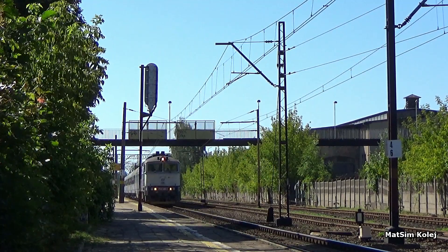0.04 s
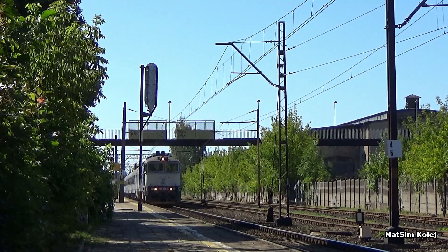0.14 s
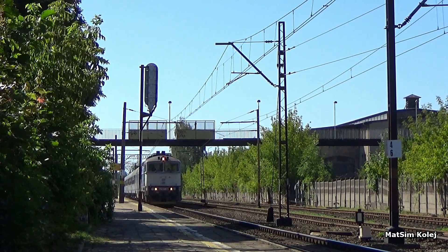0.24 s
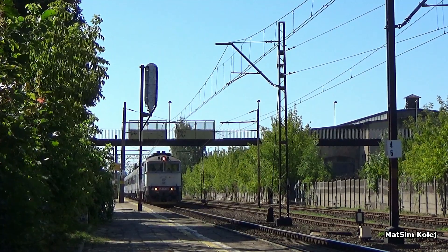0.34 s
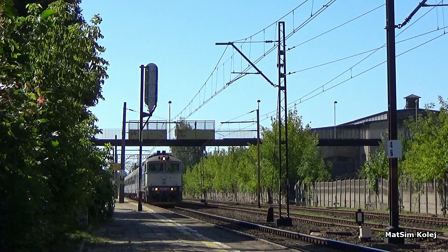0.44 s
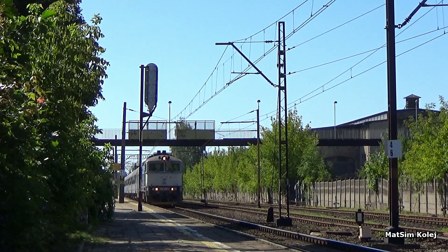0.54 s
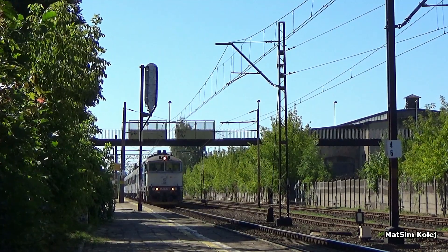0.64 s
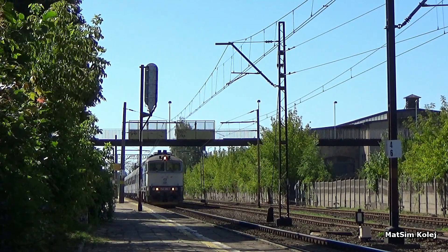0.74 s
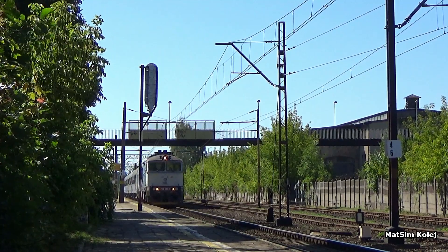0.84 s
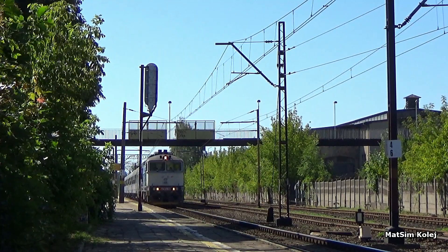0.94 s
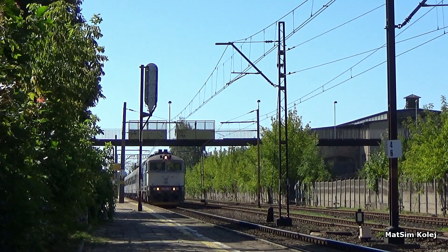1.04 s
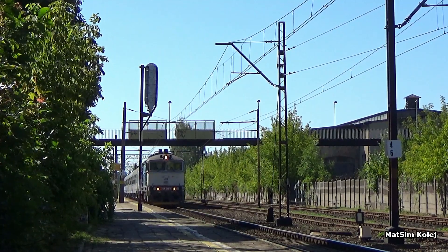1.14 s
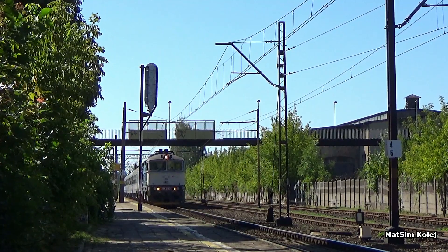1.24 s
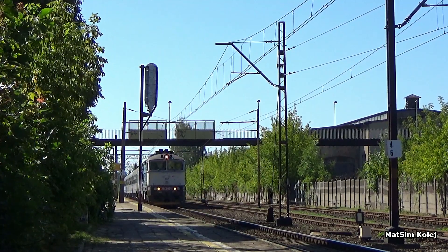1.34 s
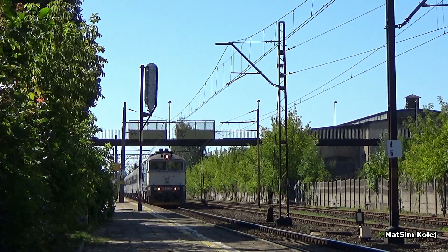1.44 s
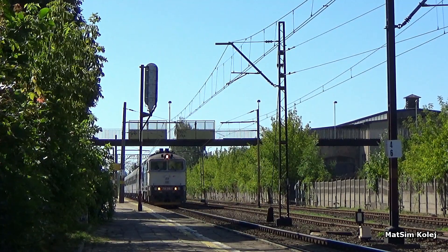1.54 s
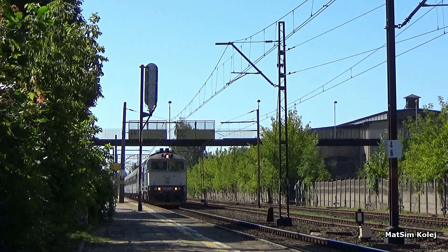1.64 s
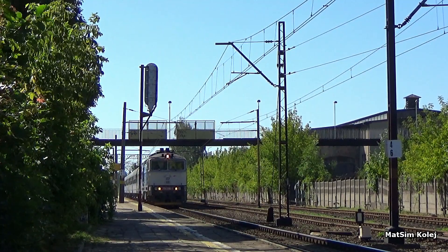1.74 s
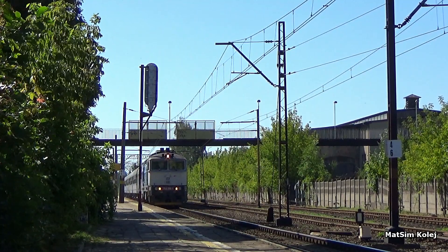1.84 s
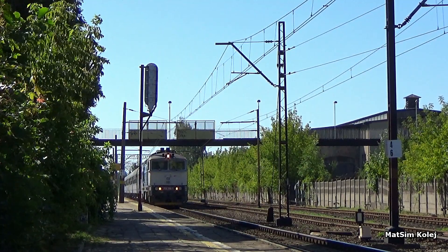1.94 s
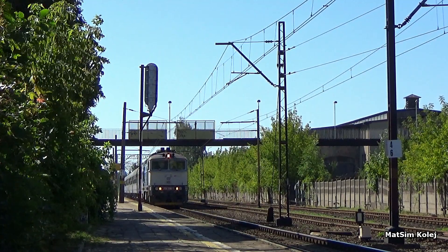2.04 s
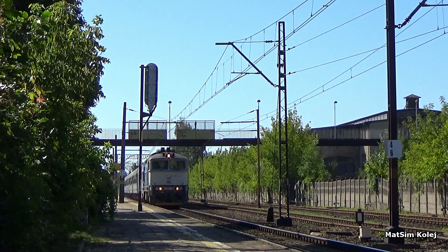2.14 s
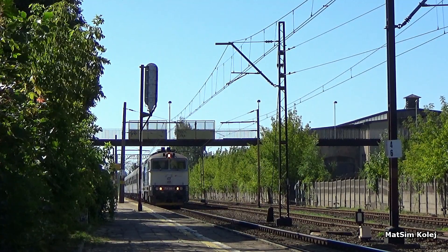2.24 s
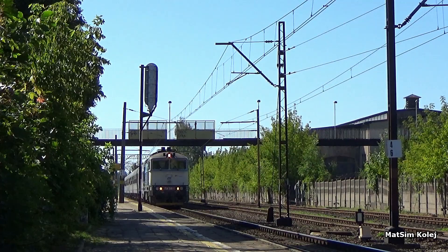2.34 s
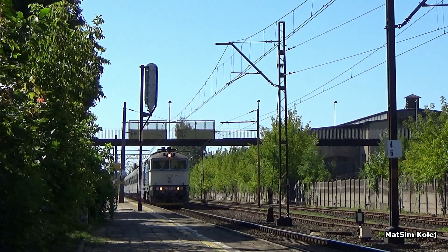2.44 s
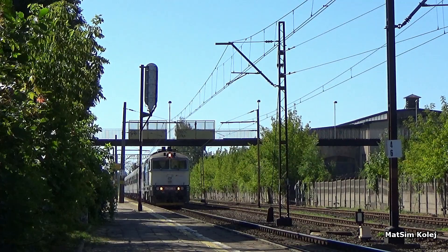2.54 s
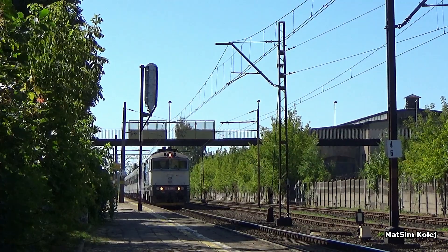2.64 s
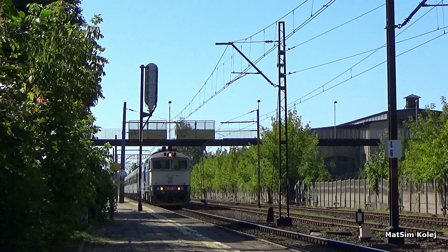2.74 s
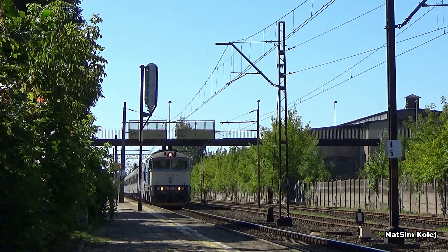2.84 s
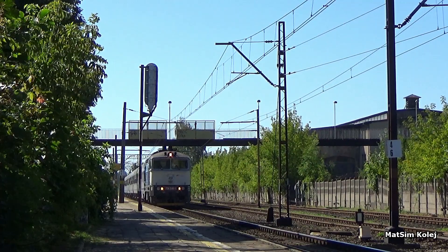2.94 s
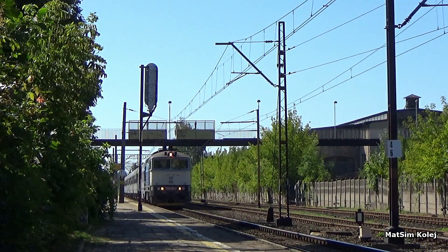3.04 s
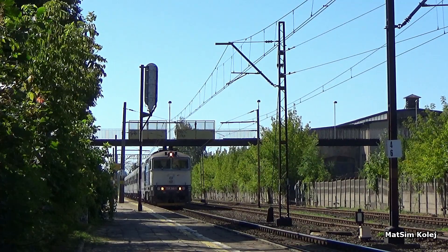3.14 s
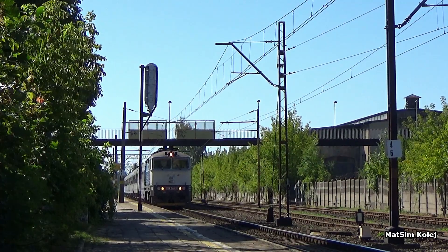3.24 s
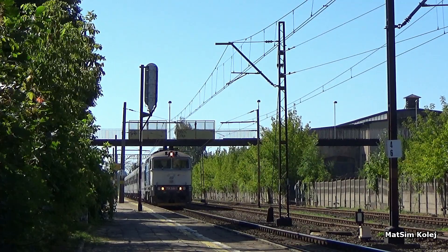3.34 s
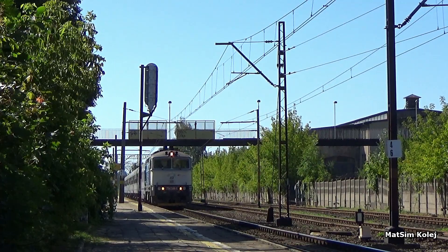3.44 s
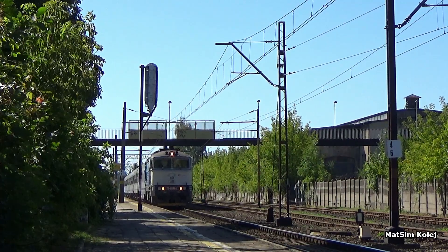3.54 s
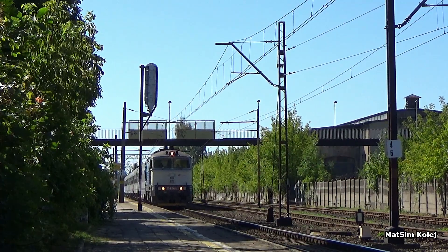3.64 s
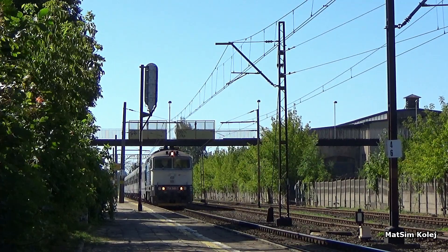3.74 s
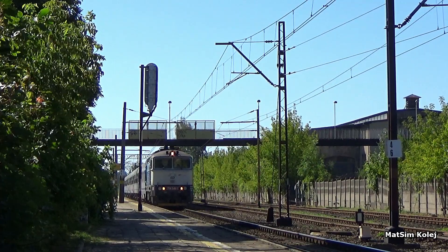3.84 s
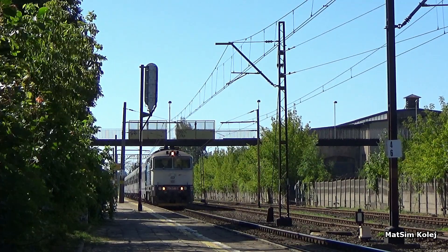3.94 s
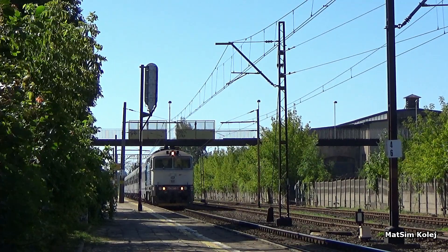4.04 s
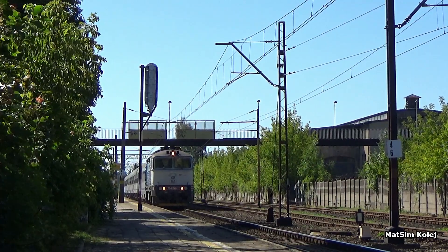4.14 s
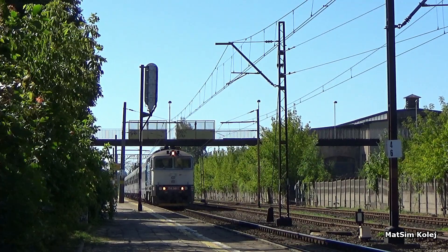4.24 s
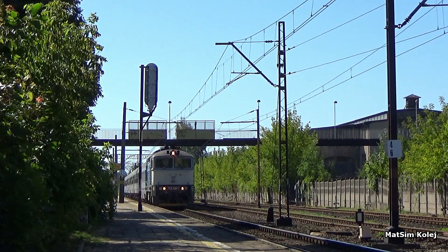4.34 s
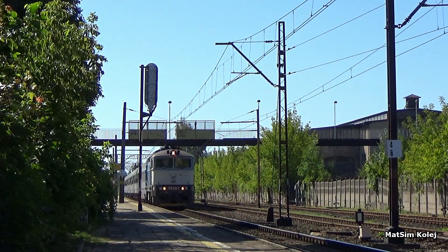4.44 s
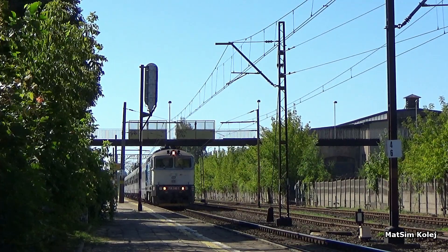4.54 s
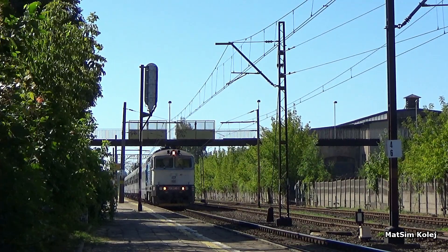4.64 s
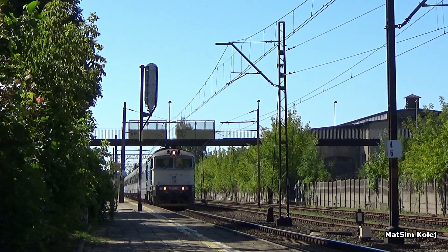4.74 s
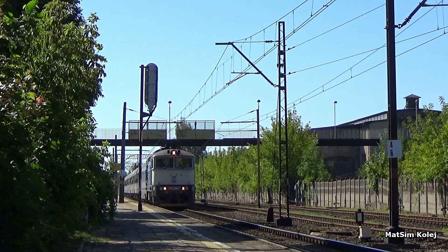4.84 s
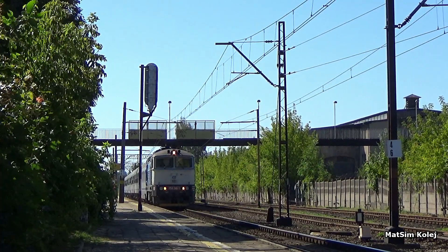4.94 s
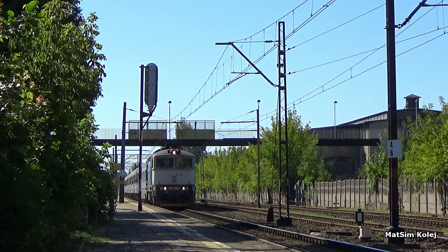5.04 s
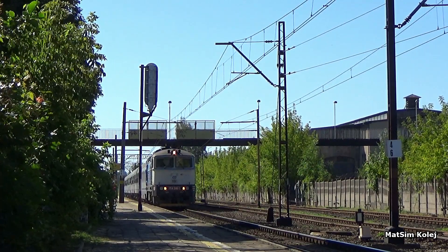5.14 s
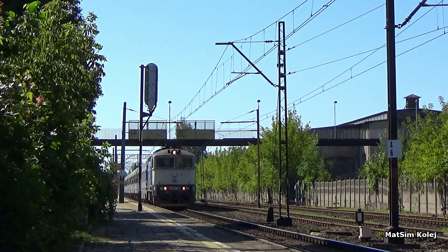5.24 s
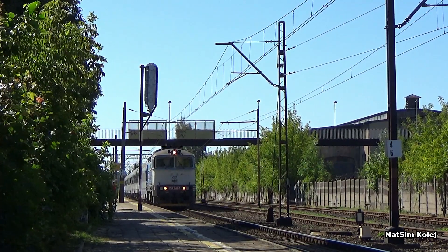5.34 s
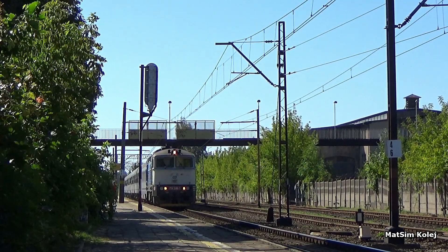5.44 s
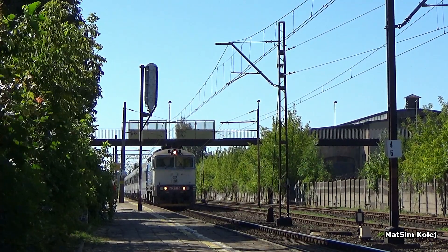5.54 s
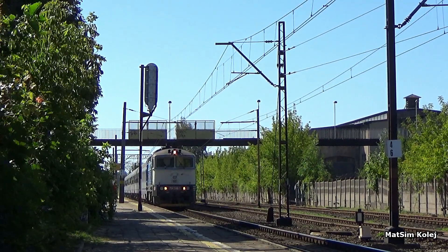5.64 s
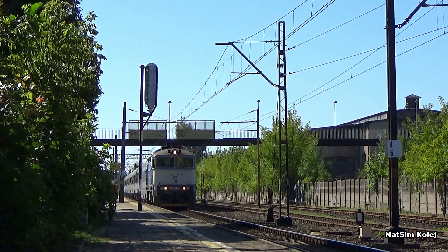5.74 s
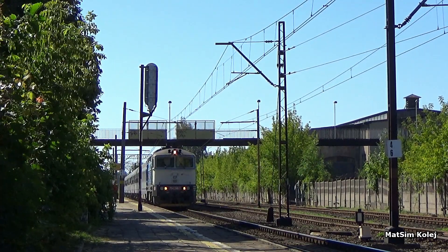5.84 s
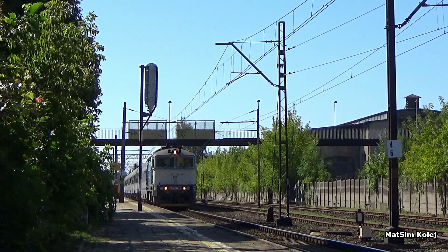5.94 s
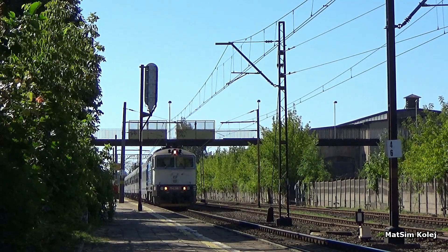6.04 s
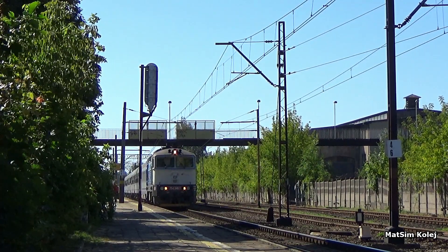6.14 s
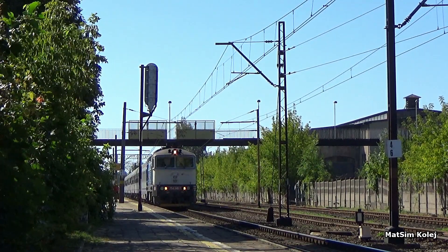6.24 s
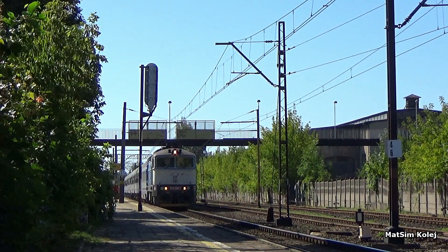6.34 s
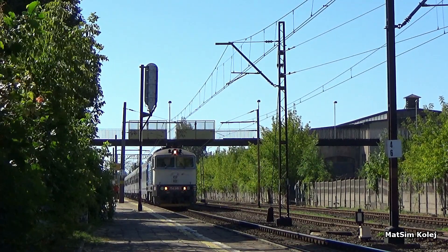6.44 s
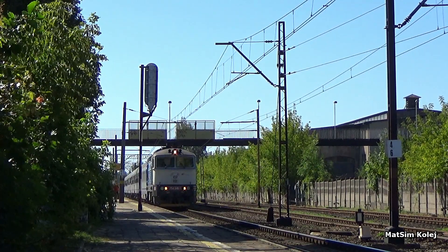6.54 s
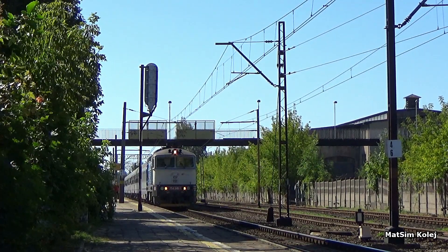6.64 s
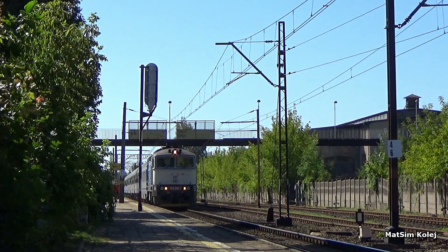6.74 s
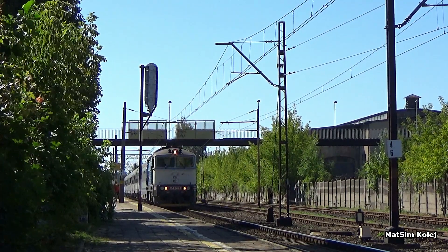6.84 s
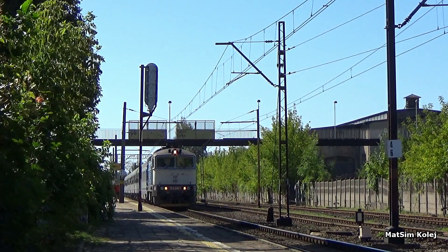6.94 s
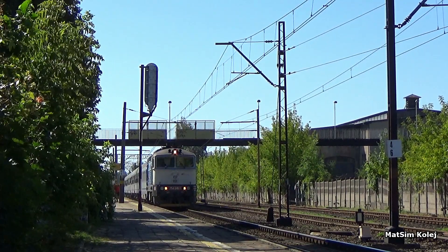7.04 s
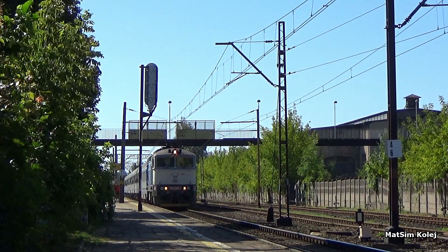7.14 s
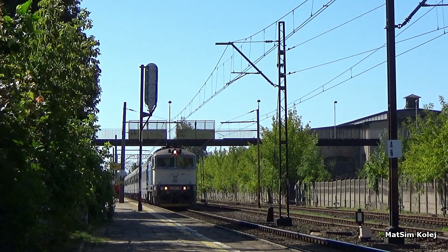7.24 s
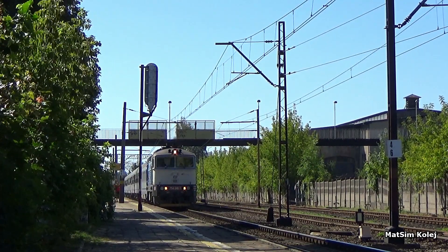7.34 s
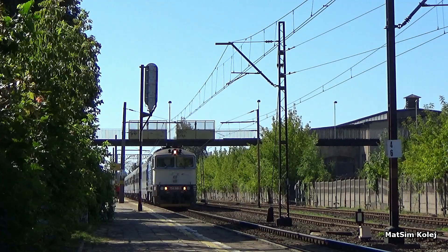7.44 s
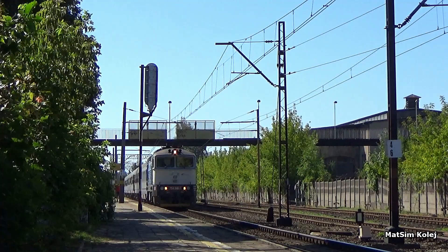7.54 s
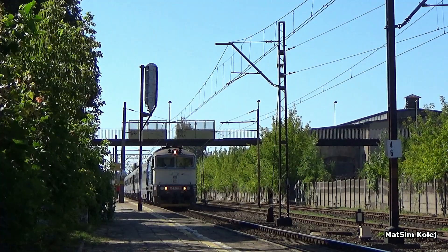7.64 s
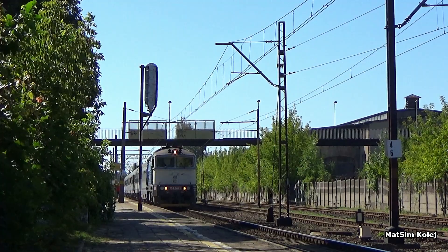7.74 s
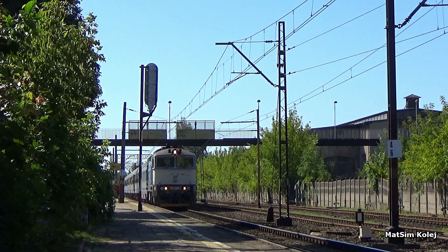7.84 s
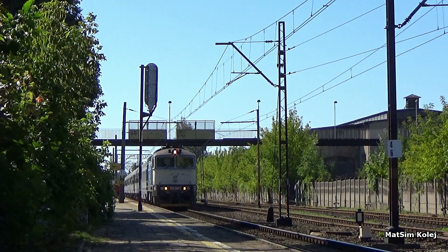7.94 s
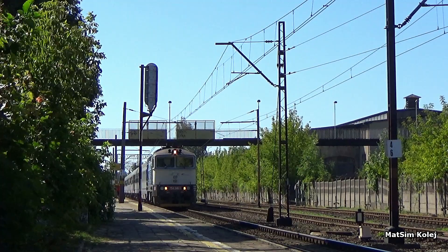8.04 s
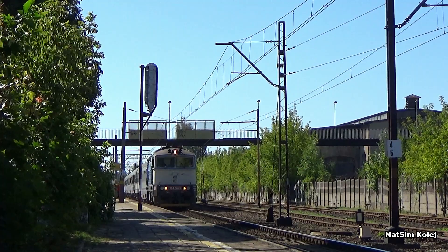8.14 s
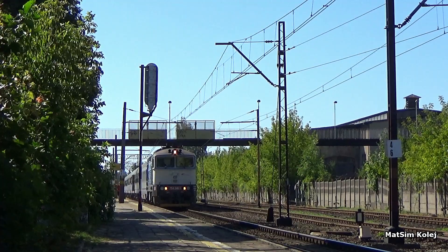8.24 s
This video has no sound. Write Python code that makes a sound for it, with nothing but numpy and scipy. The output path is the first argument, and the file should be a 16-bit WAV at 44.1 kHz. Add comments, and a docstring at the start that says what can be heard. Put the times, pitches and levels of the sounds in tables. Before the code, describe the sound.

A diesel passenger train brakes slowly along an outdoor platform. A high, wavering wheel squeal rides over the low roar of engine and rails, with grinding, hissing brakes. The squeal grows louder, joined by short squeaks and a thin whistle, then dies away near the end as a faint whine rises. A fan hums softly, couplings knock twice in the distance, and wind puffs on the microphone.

```python
"""A high, wavering squeal over a low roar: a diesel-hauled train brakes to a halt down a platform.
Stick-slip friction drives four wheels near one pitch, so they beat, with weaker rings below and above.
The brakes also grind, hiss, squeak and whistle thinly; a fan hums, couplings knock far off,
and a whine rises as the train stops. Wind puffs on the microphone ports."""
import sys
import numpy as np
from scipy.fft import rfft, irfft, next_fast_len
from scipy.io import wavfile
from scipy.ndimage import uniform_filter1d, map_coordinates

SR = 44100
rng = np.random.default_rng(int(sys.argv[2]) if len(sys.argv) > 2 else 0)


def persist_wave(psi):
    """Save psi, clipped to +-1, as 16-bit WAV."""
    counts = np.round(np.clip(psi, -1, 1) * 32767).astype(np.int16)
    wavfile.write(sys.argv[1], SR, np.atleast_2d(counts).T)


N = 366030

# Noise spectra. Each row: frequency in Hz, relative spectral density in dB.
MIC_HISS_SPECTRUM = [(5000, -31), (8000, -2.5), (12000, -9), (15700, -17)]
BUFFET_SPECTRUM = [(12, -66), (20, -33), (101, -4), (167, 2), (232, -5), (297, -4), (450, -19.5),
                   (580, -60.5), (990, -120)]
ROAR_SPECTRUM = [(24, -53), (40, -21.5), (108, -14), (166, -11.5), (407, -10.5), (500, -8.5), (603, -7.5),
                 (769, -5), (1140, -4), (1200, -5.5), (1540, -6), (2190, -10.5), (3300, -13), (4550, -77),
                 (7700, -120)]
GRIND_SPECTRUM = [(1500, -30), (2000, -7.5), (3000, -0.5), (4300, 0), (5000, -11.5), (6000, -51)]
BRAKE_HISS_SPECTRUM = [(4000, -24), (5200, 4.5), (6500, -4), (8500, -10.5), (10500, -15), (13000, -45),
                       (15700, -32)]
# Likeness of the broad noises at the two ears. Each row: frequency in Hz, correlation.
COHERENCE = [(60, 1), (300, 0.98), (1000, 0.81), (3000, 0.92), (6000, 0.87), (10000, 1), (12000, 1)]
# Stereo balance of all but the wind. Each row: frequency in Hz, left minus right in dB.
BALANCE = [(60, -3), (99, 0.0), (160, 0), (270, -1), (450, 0), (740, -1.0), (1220, -1), (2010, -3),
           (3330, -2.5), (5500, -0.5), (9080, 1), (15000, 0.0)]
# Sustained gusts. Each row: start in seconds, length in seconds, strength in dB.
WIND_GUSTS = [(0, 1.2, -63), (2.749, 1.44, -45), (4.263, 0.29, -50), (4.554, 0.9, -50.5)]
# Sudden puffs. Each row: centre in seconds, half-width in seconds, strength in dB.
WIND_PUFFS = [(0.335, 0.012, -38), (.564, 0.017, -34), (.6, 0.0071, -32.5), (2.824, 0.015, -40),
              (2.903, 0.015, -38), (2.958, 0.0077, -34), (3.03, 0.021, -33), (3.078, 0.0075, -34),
              (3.175, 0.027, -32), (3.382, 0.019, -47), (3.527, 0.025, -31.5), (3.562, 0.013, -26.5),
              (3.6, 0.014, -37), (4.021, 0.0088, -39.5), (4.111, 0.01, -36), (4.29, 0.022, -40),
              (4.385, 0.032, -34.5), (4.465, 0.025, -37), (4.721, 0.016, -30.5), (4.88, .015, -42),
              (4.916, 0.015, -26), (5.233, 0.023, -46.5), (6.296, 0.021, -38.5)]
# Roar of engine and rails. Each row: time in seconds, level in dB.
ROAR_LEVEL = [(0.0, -36.5), (2.5, -39.5), (5.15, -40), (7.14, -38.5), (8.3, -42)]
# Fan harmonics. Each row: multiple, base and peak level in dB, peak time and half-width in seconds.
FAN_HARMONICS = [(4, -61, -56, 7.8, 1.6), (5, -64, -57, 5, 1.8), (7, -62, -51, 6.6, .8),
                 (8, -66, -52, 6.9, .9), (9, -62, -49.5, 6, 3)]
# Late whine. Each row: time in seconds, pitch in Hz.
WHINE_PITCH = [(6.85, 1350), (7.7, 1572), (8.2, 1572)]
# Coupling impacts. Each row: start in seconds, level in dB, 60 dB decay time in seconds, centre in Hz.
COUPLING_KNOCKS = [(5.385, -30, .35, 2800), (7.48, -28, .13, 1400)]
# Grinding of the brake blocks. Each row: time in seconds, level in dB.
GRIND_LEVEL = [(0.0, -44), (1.4, -42.5), (1.65, -38.5), (2.56, -42), (3.3, -40.5), (3.88, -37), (4.35, -42),
               (6.36, -40), (6.75, -37.5), (7.05, -44.5), (7.25, -48.5), (8.0, -55), (8.3, -51.5)]
# High modes of the brake discs. Each row: time in seconds, level in dB.
DISC_LEVEL = [(0.0, -58), (1.02, -60), (1.15, -53), (1.7, -51), (1.82, -57.5), (2.8, -58), (3.1, -49.5),
              (3.45, -51.5), (3.91, -55), (5.47, -54.5), (6.28, -52), (6.75, -52), (6.85, -71), (7.2, -72)]
# Groups of disc modes. Each row: one group's modes, as pairs of centre and width in Hz.
DISC_RESONANCES = [
    [(8150, 35), (8250, 5.2)],
    [(11700, 82)],
    [(12450, 40), (12600, 200), (12750, 50)],
    [(13750, 60), (13880, 150), (14000, 50)],
]
# The same groups. Each row: offset from DISC_LEVEL in dB, time of falling silent in seconds.
DISC_SHARES = [(3, 7.2), (-13, 7.8), (-6, 6.7), (-6.5, 6.55)]
# Thin disc whistle. Each row: time in seconds, level in dB.
WHISTLE_LEVEL = [(3.0, -69), (3.09, -56), (3.8, -62), (4.88, -43), (4.97, -54), (5.62, -38), (5.78, -49),
                 (6.63, -70), (6.8, -78)]
# Short squeaks. Each row: start and length in seconds, centre and width in Hz, level in dB.
SHORT_SQUEAKS = [(2.24, .3, 12440, 15, -58), (3.0, .25, 8165, 30, -51), (3.36, .12, 3510, 40, -44),
                 (3.5, .25, 2680, 200, -43), (3.57, .12, 3430, 30, -44), (3.77, .11, 3440, 30, -45),
                 (4.02, .2, 3450, 30, -46), (4.5, .12, 3390, 50, -45), (4.68, .55, 3440, 35, -42),
                 (5.32, .2, 3440, 30, -47), (5.7, .7, 13990, 12, -63), (5.75, .2, 3440, 30, -49),
                 (6.0, .16, 3230, 45, -44), (6.05, .08, 3480, 60, -46), (6.18, .14, 7785, 20, -57),
                 (6.24, .2, 3510, 50, -43), (6.55, .2, 3900, 100, -46), (6.58, .2, 7785, 20, -58),
                 (6.58, .22, 3220, 50, -45), (6.68, .14, 2780, 80, -41), (6.75, .27, 3440, 5, -35),
                 (7.02, .12, 3130, 60, -45), (7.695, .045, 3720, 200, -45), (7.76, .04, 5040, 60, -51),
                 (8.14, .2, 3700, 250, -48), (8.18, .14, 4490, 60, -57), (8.15, .17, 7800, 40, -60)]
# Wheel squeal. Each row: time in seconds, level in dB, loudest pitch in Hz, half-pitch ring in dB.
WHEEL_SQUEAL = [(0, -36, 4630, -57), (.35, -30.5, 4660, -52.5), (1.35, -28.5, 4625, -51.5),
                (1.7, -23.5, 4635, -44), (2.15, -25, 4617, -46), (2.55, -29, 4616, -48.5),
                (3.28, -22.5, 4657, -47.5), (3.45, -21, 4623, -38), (4.08, -18.5, 4610, -39),
                (4.2, -23.5, 4608, -40.5), (4.66, -23.5, 4630, -46.5), (4.9, -19, 4580, -41),
                (5.1, -15.5, 4560, -40), (5.25, -22, 4620, -41), (5.43, -19.5, 4587, -36),
                (5.58, -26, 4635, -43), (5.73, -22, 4573, -39.5), (6.24, -22.5, 4610, -47),
                (6.36, -18, 4600, -38.5), (6.82, -22, 4585, -41.5), (6.93, -22, 4570, -40),
                (7.35, -35.5, 4656, -56), (7.45, -44.5, 4580, -61), (7.72, -52, 4620, -71),
                (7.82, -70, 4600, -70), (8.3, -75, 4600, -72)]
# Rings near 1/2, 3/2 and 2 times the wheels' mean pitch. Each entry: a frequency ratio.
RING_RATIOS = [.4965, 1.492, 1.99]

CALM_DB, CALM_DB_PER_S, GUST_EDGE_S = -57.5, -1.5, .06
FAN_HZ, WHINE_DB, TOP_HZ = 126.8, -52.5, 15700
WHISTLE_START_HZ, WHISTLE_SAG_HZ_PER_S = 12856, 7.5
FAINT_SQUEAKS, FAINT_SPAN_S, FAINT_RANGE_HZ = 45, (2.6, 7.1), (2500, 4200)
MEAN_HZ, SAG_HZ_PER_S, SPREAD_HZ, NARROWS_HZ_PER_S = 4642, 3.5, 205, 15
APART_DB, SWAP_DB = 24, 2.5  # a wheel's loss one spread from the loudest pitch; its random swing


def amp(db):
    """Amplitude ratio of a level in dB."""
    return 10 ** (np.asarray(db) / 20)


def unit(x):
    """Normalisation to rms 1."""
    return x / np.sqrt(np.mean(x ** 2) + 1e-20)


def along(points, hz):
    """Interpolation of (Hz, value) points on a logarithmic frequency axis."""
    f, v = np.transpose(points)
    return np.interp(np.log(hz + 1), np.log(f + 1), v)


def curves(rows):
    """Linear interpolation in time: one value per sample for each column after the first."""
    s, *cols = np.transpose(rows)
    return [np.interp(np.arange(N) / SR, s, c) for c in cols]


def lasting(start, end, fade):
    """A trapezoidal envelope, fading in after start and out before end, all in seconds."""
    t = np.arange(N) / SR
    return np.clip(np.minimum(t - start, end - t) / fade, 0, 1)


def wobble(rate):
    """Smooth random modulation, rate knots a second."""
    return map_coordinates(rng.standard_normal(int(N * rate / SR) + 4), [np.arange(N) * rate / SR])


def running_rms(x, size):
    """Envelope of a stereo signal: its rms over size samples."""
    return np.sqrt(np.abs(uniform_filter1d(np.mean(x ** 2, axis=0), size=size)))


def filtered(x, response):
    """Linear filtering: the spectrum of x times a response of frequency."""
    m = next_fast_len(x.shape[-1] + 8192)
    return irfft(rfft(x, m) * response(np.fft.rfftfreq(m, 1 / SR)), m)[..., :x.shape[-1]]


def stereo_noise(gain, alike, size=N):
    """Noise of rms 1; the ratio of mid to side sets the left-right correlation, alike(hz)."""
    def response(hz):
        angle = np.arccos(np.clip(alike(hz), -.99, .999)) / 2
        return gain(hz) * [np.cos(angle), np.sin(angle)]
    mid, side = filtered(rng.standard_normal((2, size)), response)
    return unit(np.array([mid + side, mid - side]))


def broadband(spectrum, coherence=COHERENCE):
    """Stereo noise shaped by a tabulated spectrum and coherence."""
    return stereo_noise(lambda hz: amp(along(spectrum, hz)), lambda hz: along(coherence, hz))


def ringing(modes, alike, skirt, size=N):
    """Randomly driven resonance: each (centre Hz, width Hz) is a bell of noise on a weak wide skirt."""
    def gain(hz):
        detunings = ((hz - centre) / width for centre, width in modes)
        return sum(np.exp(-2 * d ** 2) + skirt / (1 + d ** 2) ** .5 for d in detunings)
    return stereo_noise(gain, lambda hz: alike + 0 * hz, size)


def tone(hz, db):
    """A sinusoid that follows a pitch and an rms level."""
    return amp(db) * np.sqrt(2) * np.sin(2 * np.pi * (np.cumsum(hz) / SR + rng.uniform()))


def unsteady(hz, rate, alike):
    """Quadrature modulation: a stereo tone's strength and phase wander, rate changes a second."""
    at = np.cumsum(rate) / SR
    knots = rng.standard_normal((4, int(at[-1]) + 2))
    a, b, c, d = [np.interp(at, np.arange(len(row)), row) for row in knots]
    phase = 2 * np.pi * np.cumsum(hz) / SR
    mid, side = a * np.cos(phase) + b * np.sin(phase), c * np.cos(phase) + d * np.sin(phase)
    angle = np.arccos(np.clip(alike, 0, 1)) / 2
    return unit(np.cos(angle) * mid + np.sin(angle) * side * [[1], [-1]])


def mic_hiss():
    """Stationary noise: a faint, steady, high microphone hiss."""
    return amp(-60.5) * broadband(MIC_HISS_SPECTRUM)


def wind():
    """Turbulent pressure buffets each port partly differently; stronger puffs are brighter."""
    t = np.arange(N) / SR
    breeze = amp(CALM_DB + CALM_DB_PER_S * t)
    breeze += sum(amp(db) * lasting(s - GUST_EDGE_S, s + length, GUST_EDGE_S)
                  for s, length, db in WIND_GUSTS)
    puffs = sum(amp(db) * np.exp(-((t - s) / half) ** 2) for s, half, db in WIND_PUFFS)
    strength = breeze * amp(1.7 * wobble(25)) + puffs
    coherence = [(50, .97), (250, .5)]
    buffet = broadband(BUFFET_SPECTRUM, coherence)
    buffet /= (.67 + running_rms(buffet, 1000)) ** .66  # evens out chance peaks
    bright = broadband([(100, -54), (250, -8), (550, -16.5), (900, -43), (1500, -120)], coherence)
    return strength * (buffet + 12 * strength * bright)


def roar():
    """The engine and steel rolling on the rails radiate broadband noise."""
    return amp(curves(ROAR_LEVEL)[0] + .4 * wobble(9)) * broadband(ROAR_SPECTRUM)


def fan():
    """Periodic rotation gives a harmonic hum; each harmonic swells once as the engine nears."""
    t = np.arange(N) / SR
    hz = FAN_HZ + .414 * wobble(3)
    hum = np.zeros(N)
    for multiple, base_db, peak_db, s, half in FAN_HARMONICS:
        swell = np.exp(-((t - s) / half) ** 2)
        hum += tone(round(multiple) * hz, base_db + (peak_db - base_db) * swell + 2 * wobble(6))
    return hum


def whine():
    """A glide: one tone rises, then holds as the train stops."""
    envelope = lasting(WHINE_PITCH[0][0], WHINE_PITCH[-1][0], .23)
    return envelope * tone(curves(WHINE_PITCH)[0] + 6 * wobble(15), WHINE_DB + 3 * wobble(9.4))


def couplings():
    """Impacts excite a broad resonance that decays exponentially; distance smears the attack."""
    out = np.zeros((2, N + SR))
    t = np.arange(SR // 2) / SR
    for s, db, t60, hz in COUPLING_KNOCKS:
        envelope = amp(db - 60 * t / t60) * (1 - np.exp(-t / .0068))
        ring = ringing([(hz, .6 * hz)], alike=.85, skirt=.03, size=len(t))
        out[:, round(s * SR):][:, :len(t)] += envelope * ring
    return out[:, :N]


def brake_blocks():
    """Sliding friction makes noise: a grinding, and a higher hiss that follows it less steeply."""
    grind_db, = curves(GRIND_LEVEL)
    hiss_db = -48 + .82 * (grind_db + 41)
    grind = amp(grind_db + 1.2 * wobble(9)) * broadband(GRIND_SPECTRUM)
    hiss = amp(hiss_db + 1.1 * wobble(9)) * broadband(BRAKE_HISS_SPECTRUM)
    return grind + hiss


def brake_discs():
    """Friction excites the discs' high modes, which flicker while the brakes rub."""
    level_db, = curves(DISC_LEVEL)
    out = np.zeros((2, N))
    for (offset_db, end), modes, alike in zip(DISC_SHARES, DISC_RESONANCES, (-.21, .97, 1, .97)):
        envelope = amp(level_db + offset_db + 2.6 * wobble(6)) * lasting(-1, end, .15)
        out += envelope * ringing(modes, alike, skirt=.25)
    return out


def disc_whistle():
    """Self-excited oscillation: one disc mode sings as a thin, slowly sinking tone."""
    start, end = WHISTLE_LEVEL[0][0], WHISTLE_LEVEL[-1][0]
    hz = WHISTLE_START_HZ - WHISTLE_SAG_HZ_PER_S * (np.arange(N) / SR - start)
    whistle = tone(hz + 6 * wobble(30), curves(WHISTLE_LEVEL)[0] + 2 * wobble(20))
    return lasting(start, end, .1) * whistle


def squeaks():
    """Friction catches single modes for a moment; faint random squeaks join the listed ones."""
    faint = [(np.interp(when, [0, 1], FAINT_SPAN_S), .09 * (.5 + long),
              np.interp(high, [0, 1], FAINT_RANGE_HZ), 50, -52 + 6 * loud)
             for when, long, high, loud in rng.uniform(size=(FAINT_SQUEAKS, 4))]
    out = np.zeros((2, N + SR))
    for s, length, hz, width, db in SHORT_SQUEAKS + faint:
        n = round(length * SR)
        ring = ringing([(hz, width)], alike=1, skirt=.042, size=n)
        out[:, round(s * SR):][:, :n] += amp(db) * np.hanning(n) ** .5 * ring
    return out[:, :N]


def wheel_rasp(spread_hz):
    """Friction noise around the squeal follows the grinding and fades as the pitches converge."""
    envelope = amp(curves(GRIND_LEVEL)[0] + 4 + 1.5 * wobble(4)) * spread_hz / SPREAD_HZ
    return envelope * ringing([(4630, 450)], alike=.95, skirt=.15)


def wheel_rings(mean_hz, spread_hz):
    """Three partials follow the wheels' mean pitch at constant ratios."""
    rings = [unsteady(ratio * mean_hz, rough * spread_hz, alike)
             for ratio, rough, alike in zip(RING_RATIOS, (.75, .8, 1), (.93, .9, .8))]
    rings[0] += amp(-5) * ringing([(2320, 450)], alike=.9, skirt=.2)  # the lowest is raspy too
    return rings


def wheel_squeal():
    """Stick-slip drives four wheels that beat; their pitches converge and steady as the train slows."""
    t = np.arange(N) / SR
    level_db, loudest_hz, half_db = curves(WHEEL_SQUEAL)
    centre_hz = MEAN_HZ - SAG_HZ_PER_S * t
    spread_hz = SPREAD_HZ - NARROWS_HZ_PER_S * t
    pitches = [centre_hz + spread_hz * place + 6 * wobble(3) for place in np.linspace(-.5, .5, 4)]
    shares = np.array([amp(SWAP_DB * wobble(1.5) - APART_DB * ((hz - loudest_hz) / spread_hz) ** 2)
                       for hz in pitches])
    shares /= np.sqrt(np.sum(shares ** 2, axis=0))  # constant total power
    wheels = sum(share * unsteady(hz, .29 * spread_hz, alike=.98) for share, hz in zip(shares, pitches))
    wheels /= (running_rms(wheels, 3000) + .024) ** .7  # stick-slip holds its strength fairly even
    mean_hz = (np.sum(shares ** 2 * pitches, axis=0) + centre_hz) / 2
    rasp = wheel_rasp(spread_hz)
    rings = wheel_rings(mean_hz, spread_hz)
    ring_db = half_db, -50 + 1.5 * (half_db + 42), level_db - 32.5  # the 3/2 ring swings half again as far as the half-pitch ring; the double follows the squeal
    squeal = amp(level_db + 2.27 * wobble(5)) * wheels
    return squeal + rasp + sum(amp(db + 1.95 * wobble(7)) * ring for db, ring in zip(ring_db, rings))


def scene():
    """Superposition: the sources lean left or right by frequency, and the wind is added on top."""
    sources = wheel_squeal() + brake_discs() + disc_whistle() + squeaks() + couplings()
    sources += roar() + brake_blocks() + fan() + whine() + mic_hiss()
    return filtered(sources, lambda hz: amp(along(BALANCE, hz) * [[.5], [-.5]])) + wind()


def record(dry):
    """Band limiting: an ideal low-pass removes everything above TOP_HZ."""
    return filtered(dry, lambda hz: hz < TOP_HZ)


dry = scene()
out = record(dry)
persist_wave(out)
```